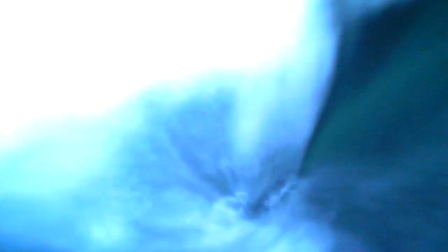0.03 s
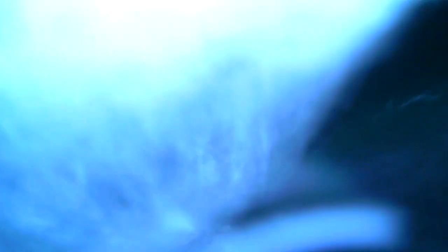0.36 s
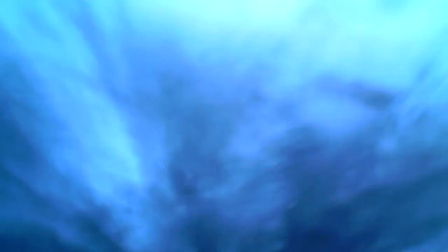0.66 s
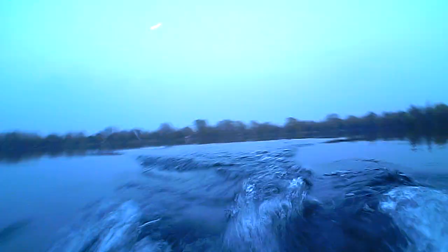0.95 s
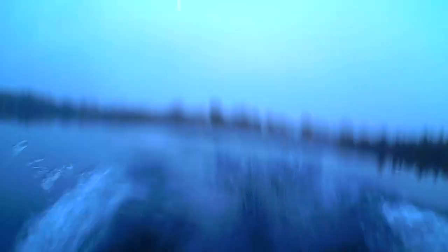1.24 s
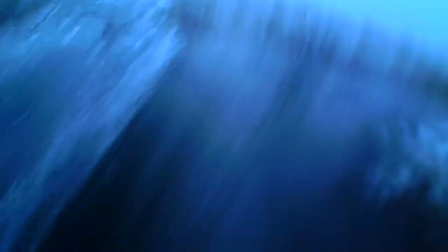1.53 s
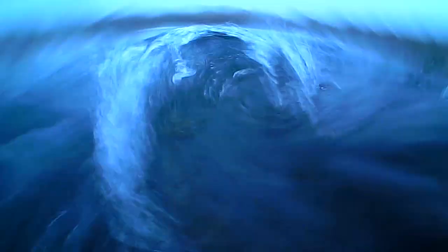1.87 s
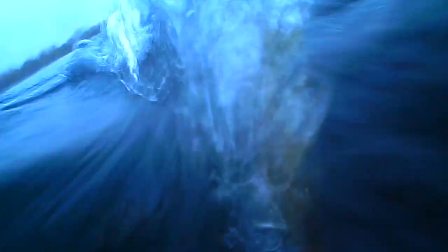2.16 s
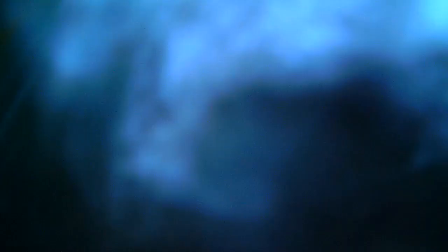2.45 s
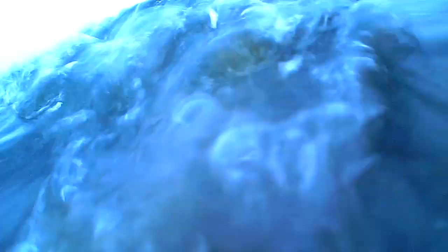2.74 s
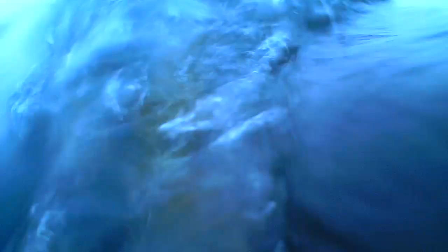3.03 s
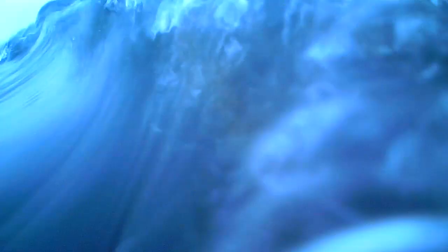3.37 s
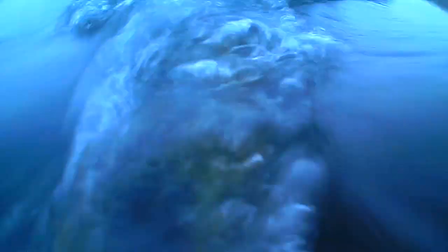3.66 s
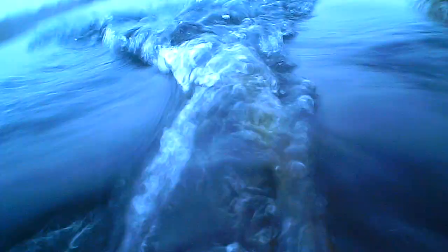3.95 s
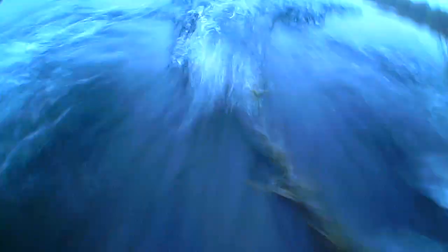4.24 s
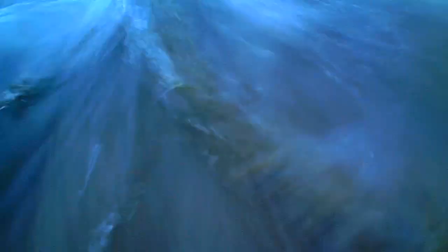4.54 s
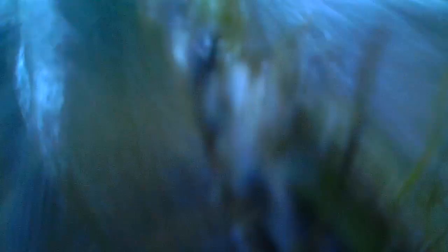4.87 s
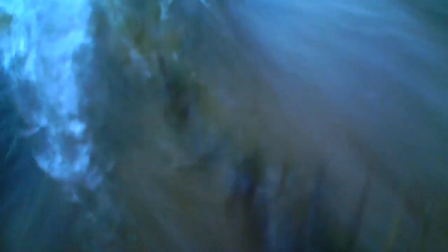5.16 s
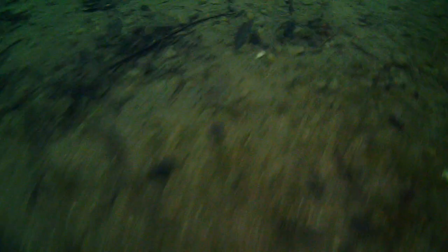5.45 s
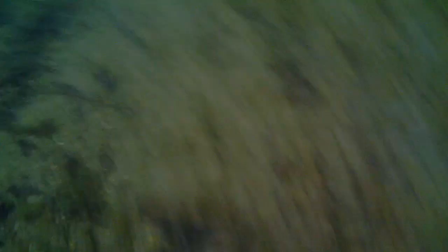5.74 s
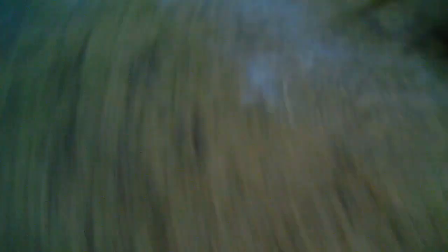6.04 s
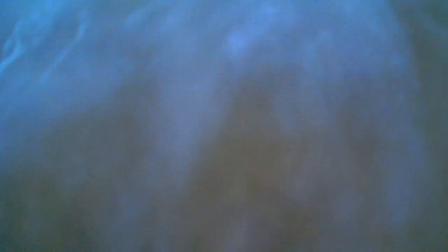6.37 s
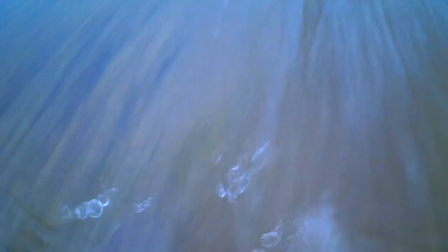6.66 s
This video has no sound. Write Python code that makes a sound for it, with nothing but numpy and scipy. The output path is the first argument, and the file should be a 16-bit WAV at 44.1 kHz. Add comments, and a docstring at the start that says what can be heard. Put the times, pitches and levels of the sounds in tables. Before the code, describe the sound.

A fishing reel whirrs and rasps in throbbing spurts through a taut line, while water splashes and bubbles close by.

```python
"""A fishing reel whirrs down a taut line into the housing of a small sealed camera towed through a lake.
The line rasps and squeaks by friction, coloured by the housing, and the meshing gears add a rough hum.
The whirr throbs with the winding, which stops once and starts again. As the camera breaks the surface,
bubbles ring against the shell, spray ticks on it and water sloshes past, over a low rumble and hiss."""
import sys
import numpy as np
from scipy import signal
from scipy.io import wavfile
from scipy.ndimage import uniform_filter1d

SR = 44100
rng = np.random.default_rng(int(sys.argv[2]) if len(sys.argv) > 2 else 0)


def to_wav(sig):
    """Store sig (one row per channel, or 1-D mono) as 16-bit WAV at the path in sys.argv[1].

    Samples outside -1..1 are clipped; the rate is SR.
    """
    pcm = np.clip(np.atleast_2d(sig), -1, 1) * 32767
    pcm = np.round(pcm).astype(np.int16)
    wavfile.write(sys.argv[1], SR, pcm.T)  # frames by channels


N = 295470
TIME = np.arange(N) / SR

# Levels are relative: each source applies its own gains.
# strain on the line through winding, stop and winding: t/s, rasp level/dB, hum level/dB
LINE_STRAIN = [(0, -49.5, -53), (.55, -45, -53), (.75, -46.5, -53), (.85, -53, -60), (1.08, -55, -62.5),
               (1.2, -56.5, -57), (1.35, -54.5, -73), (1.8, -51, -59.5), (2.45, -50.5, -59),
               (2.7, -42.5, -48), (3.15, -40, -51.5), (3.33, -43, -48), (3.55, -39, -46.5),
               (3.87, -38, -45.5), (4.13, -45, -45), (4.38, -41, -47.5), (4.62, -43.5, -42),
               (4.85, -39.5, -40.5), (5.02, -42, -43), (5.16, -46.5, -60.5), (5.24, -74, -82),
               (6.0, -76, -66), (6.07, -44.5, -47), (6.17, -40, -41), (6.42, -40.5, -38),
               (6.49, -44, -51.5), (6.56, -56, -71), (6.63, -41, -47), (6.7, -45.5, -54)]
# strokes of winding, each throbbing evenly until the next: start t/s, throb rate f/Hz
WINDING_STROKES = [(0.008, 48.5), (0.132, 54.4), (0.26, 50.3), (0.539, 46.1), (0.879, 63.5), (1.73, 49.5),
                   (2.565, 33.1), (2.739, 20.3), (2.886, 37.8), (2.992, 24.8), (3.113, 35.8), (3.169, 19.2),
                   (3.377, 28.9), (3.481, 35.1), (3.681, 21.9), (3.817, 32.1), (4.098, 20.9), (4.289, 24.1),
                   (4.372, 29.5), (4.542, 38.6), (4.775, 31.1), (4.904, 19.9), (6.073, 22.5), (6.162, 31.2),
                   (6.386, 23.2)]
# modulation of the whirr: t/s, throb depth, chatter depth (0-1)
MODULATION = [(0, 1.6, 0.1), (.75, 2, 0.34), (.9, 0.56, .2), (2.4, 0.37, 0.4), (2.6, 1.8, 0.86),
              (3.6, 1.43, 0.8), (4.3, 2.03, 0.62), (4.9, 1.6, .1), (5.1, 0.37, .1), (6.3, 1.55, 0.03),
              (6.7, 0.55, 0)]
# hardest tugs on the line: t/s, rasp level/dB, hum level/dB, half-width/s
LINE_TUGS = [(2.595, -36, -47, 0.0027), (3.641, -31, -39, 0.0012), (3.818, -32, -41, 0.0043),
             (3.94, -34, -46, 0.0027), (4.144, -50, -30, 0.0038), (4.332, -45, -42, 0.0021),
             (4.542, -39, -49, .0026), (4.723, -38, -48, .0024), (4.804, -33, -48, 0.0028),
             (6.196, -57, -31.5, 0.0039), (6.387, -32, -39, 0.0035)]
# bright response of the housing to the line: f/Hz, level/dB
RASP_RESPONSE = [(1000, -49), (1500, -14), (1800, -11.5), (2060, -33), (2170, -17.5), (2350, -7),
                 (2700, -8), (2950, 3.5), (3170, -2.5), (3500, 5), (3850, -2.5), (4150, -12.5),
                 (4450, -26.5), (9000, -99.5)]
# response to the line's softer, broader rub: f/Hz, level/dB
RUB_RESPONSE = [(900, -19.5), (1200, -22), (1360, 0), (1560, -1), (1800, -8), (2080, 8.5), (2200, -6),
                (2500, -6.5), (4000, 4.5), (4430, -35), (4800, -7.5), (5700, -11), (6700, -21),
                (12000, -44)]
# tooth rate of the gears, wandering with the winding speed: t/s, f/Hz
TOOTH_RATE = [(0, 780), (.55, 790), (.9, 735), (2.6, 715), (3.5, 755), (3.85, 725), (4.1, 785), (4.3, 745),
              (4.62, 720), (4.93, 765), (5.1, 735), (6.06, 720), (6.16, 780), (6.43, 760), (6.55, 725)]
# spectrum of the rough, noisy part of the gear hum: f/Hz, level/dB
GEAR_NOISE_SPECTRUM = [(200, -34.5), (350, -20.5), (480, -30), (610, -48.5), (670, -5), (700, -0.5),
                       (770, 3.5), (830, 1.5), (885, -20), (1000, -27), (1500, -64.5)]
# loudest bubbles: t/s, level/dB, f/Hz, 60 dB decay time/s
LOUDEST_BUBBLES = [(0.029, -38.5, 6270, .006), (0.1493, -37, 9806, .006), (0.288, -37, 5300, .009),
                   (0.3561, -12.5, 4040, 0.0034), (0.466, -22, 2110, 0.002), (0.569, -32.5, 5740, 0.0021),
                   (1.434, -26, 1430, .016), (1.873, -34.5, 1490, 0.027), (2.298, -29.5, 947, 0.04),
                   (2.352, -13.5, 3560, 0.0056), (2.3995, -16.5, 3500, 0.011), (2.406, -14, 3202, 0.0021),
                   (2.4122, -15.5, 3200, .009), (2.435, -30, 1420, 0.025), (2.4416, -23, 3400, .01),
                   (2.469, -22.5, 1640, 0.014), (2.48, -25.5, 3300, 0.0066), (2.489, -29.5, 1345, .021),
                   (3.1637, -28.5, 6000, .007), (3.2832, -27.5, 5760, 0.0051), (3.2924, -32, 5620, 0.016),
                   (3.374, -13.5, 3140, 0.0087), (5.3777, -21, 5900, 0.0037), (5.3775, -24.5, 4100, .0046),
                   (5.3785, -25, 11000, .004), (5.385, -25.5, 3200, 0.0099), (5.393, -25, 5200, .006),
                   (5.423, -24.5, 3280, 0.007), (5.4426, -31, 1730, 0.023), (5.4512, -26, 1060, 0.042),
                   (5.4584, -20, 4440, .0021), (5.473, -23, 2870, .014), (5.4738, -27.5, 1980, 0.024),
                   (5.4804, -26, 5660, .0046), (5.487, -25.5, 3450, 0.016), (5.491, -29, 2930, 0.026),
                   (5.517, -33, 1450, 0.0074), (5.5257, -22.5, 2975, 0.022), (5.566, -41, 1350, .01),
                   (5.584, -43, 3670, .02), (5.626, -44, 1650, .034), (5.6494, -31.5, 2020, .003),
                   (5.6732, -42.5, 3120, .017), (5.7082, -40, 1340, 0.01), (5.7461, -22, 3070, .005),
                   (5.7635, -31.5, 3100, 0.0041), (5.8854, -41.5, 536, 0.011), (5.9328, -47, 2900, .009)]
# largest drops of spray: t/s, tick level/dB, knock level offset/dB
SPRAY_DROPS = [(0.0278, -44, 3), (0.194, -37, 4), (0.285, -46, 10), (0.3539, -28.5, -7), (0.47, -33, 3),
               (0.748, -32, 4.5), (0.7751, -32.5, 0), (1.4299, -28.5, 1), (1.4554, -44, 11),
               (1.4768, -27, 3), (1.4903, -29.5, 10.5), (1.619, -28.5, 2.5), (1.6512, -23, 0),
               (1.728, -30, -2), (1.942, -36.5, 3.5), (2.0306, -37, 11.5), (2.0896, -36, 12),
               (2.1073, -37, 4), (2.2865, -35.5, 9), (2.3268, -32, -8), (2.3537, -23.5, 6),
               (2.41, -27.5, 10), (2.4773, -33, 11), (2.6847, -31, -11), (3.6784, -31.5, -11),
               (3.9122, -31, -8), (5.3742, -23, -9), (5.3935, -29, 1), (5.4803, -43, 3), (5.585, -44, 7),
               (5.7487, -41, 12), (6.2377, -39.5, 5)]
# thin ring of the shell: f/Hz, level/dB
SHELL_RESPONSE = [(3500, -24.5), (4700, -10), (5350, 4), (6000, -4.5), (6600, -9), (7600, 9), (8600, -9.5),
                  (9500, -4.5), (10150, -13), (10800, -6), (12000, -18), (14500, -15), (16500, -24)]
# response of the body to a sharp impact: f/Hz, level/dB
KNOCK_RESPONSE = [(100, -20), (800, -12), (1050, -24), (1500, 5), (2200, 4.5), (3000, 8.5), (3700, -11),
                  (4600, -4), (7000, -71), (12000, -99)]
# response of the body to the push of water: f/Hz, level/dB
BODY_RESPONSE = [(30, -9), (100, -0.5), (220, 0), (450, -3.5), (750, 3.5), (1050, -10), (1450, 5.5),
                 (1750, 1.5), (2200, -3.5), (3000, 3), (3700, -3.5), (4500, -14.5), (9000, -75)]
# waves washing over the shell: start t/s, duration/s, slosh level/dB, fizz level/dB
WAVE_WASHES = [(0, 0.32, -63, -58.5), (.62, 0.063, -53.5, -58), (0.863, 0.051, -50.5, -57.5),
               (1.149, 0.1, -53.5, -64), (1.416, 0.091, -52, -52.5), (1.569, 0.13, -60.5, -52.5),
               (1.968, 0.11, -58, -57), (2.289, 0.097, -52, -56), (2.396, 0.014, -42, -39.5),
               (2.475, 0.085, -52.5, -61.5), (2.676, .025, -58, -47), (3.008, 0.26, -58.5, -61),
               (3.29, 0.21, -50.5, -59), (3.736, 0.046, -55, -63), (5.367, 0.048, -57, -52.5),
               (5.431, 0.11, -53, -62), (5.555, 0.091, -65, -64.5), (5.74, 0.021, -58, -54.5),
               (5.831, 0.1, -64.5, -80), (6.158, 0.34, -83, -69)]
# slosh of the steady flow, weaker while the winding rests: t/s, level/dB
STEADY_FLOW = [(0, -59.5), (4.9, -61), (5.25, -67.5), (5.8, -67.5), (6.2, -59.5)]
# deep buffeting by the current: t/s, level/dB
BUFFETING = [(0, -57), (.5, -66), (.7, -56), (1.5, -57.5), (1.7, -58), (2.4, -60), (3.4, -59), (4.25, -58),
             (4.7, -59.5), (5.3, -58.5), (6.7, -59)]
# spectra of the rumble and of the steady hiss: f/Hz, level/dB
RUMBLE_SPECTRUM = [(20, 6), (50, -5), (90, -7.5), (200, -26), (1000, -64)]
HISS_SPECTRUM = [(20, -13), (100, -21.5), (300, -24), (800, -26), (1500, -50), (4000, -31.5),
                 (9000, -32.5), (14000, -35.5), (16000, -41.5)]


def line(rasp_db=-1, rub_db=-9.5, rub_follows=0.35, even_share=0.13, chatter_hz=104.8,
         squeak_share=0.69, squeak_above_db=-46):
    """Friction drives the housing: irregular slips of the line rasp, regular ones squeak."""
    _, chatter = follow(MODULATION)
    stutter = 1 + chatter * np.cos(unsteady_phase(chatter_hz, jitter=0.2984, wobble_hz=60.3))
    pulsing = even_share + (1 - even_share) * throb_power(sharpness=0.94) * stutter
    power = gain_of(follow(LINE_STRAIN)[0]) ** 2 * pulsing + tugs()[0]
    # part of the power above a threshold becomes pitched; the rest stays rough
    pitched = squeak_share * (1 - chatter / 2) * np.maximum(power - gain_of(squeak_above_db) ** 2, 0)
    rough = np.maximum(power - pitched, 0)
    squeaks = squeak() * np.sqrt(pitched)
    slips = squeaks + grains(per_s=14000, spread_db=2.3) * np.sqrt(rough)
    # the rub follows the throbs only in part
    steady = np.maximum(uniform_filter1d(power, size=SR // 20), 0)
    rub_power = rub_follows * rough + (1 - rub_follows) * steady
    rub = np.sqrt(rub_follows) * squeaks + rng.standard_normal(N) * np.sqrt(rub_power)
    return gain_of(rasp_db) * through(slips, RASP_RESPONSE) + gain_of(rub_db) * through(rub, RUB_RESPONSE)


def squeak(slip_hz=680, pitch_scatter=0.08, fall_per_s=15, fall_scatter_per_s=7, harmonics=9):
    """Stick-slip oscillation: a harmonic series whose fundamental glides down through each throb."""
    number, _, age = throb_timing()
    pitch, fall = rng.standard_normal((number[-1] + 1, 2))[number].T
    rate = slip_hz * np.exp(pitch_scatter * pitch - (fall_per_s + fall_scatter_per_s * fall) * age)
    phase = unsteady_phase(rate, jitter=0.028, wobble_hz=151)
    return evened(sum(np.cos(k * phase) for k in range(1, harmonics + 1)))


def gears(tone_db=-3, noise_db=-4, octave_db=-17, suboctave_db=-23):
    """Periodic forcing: meshing teeth sound a wandering tone at the tooth rate, roughened by noise."""
    force = np.sqrt(gain_of(follow(LINE_STRAIN)[1]) ** 2 * throb_power(sharpness=0.84) + tugs()[1])
    phase = unsteady_phase(follow(TOOTH_RATE)[0], jitter=0.03, wobble_hz=30.7)
    octaves = gain_of(octave_db) * np.sin(2 * phase) + gain_of(suboctave_db) * np.sin(phase / 2)
    tone = np.sqrt(2) * (np.sin(phase) + octaves)
    roughness = through(force * rng.standard_normal(N), GEAR_NOISE_SPECTRUM)
    return gain_of(tone_db) * force * tone + gain_of(noise_db) * roughness


def throb_timing():
    """Periodic motion in each stroke: the nearest throb's number, and cycles and seconds from its peak."""
    start, rate = np.transpose(WINDING_STROKES)
    stroke = np.maximum(np.searchsorted(start, TIME) - 1, 0)
    cycle = ((TIME - start[stroke]) * rate[stroke] + 0.5) % 1 - 0.5
    number = np.cumsum(np.diff(cycle, prepend=cycle[0]) < -0.5)
    return number, cycle, cycle / rate[stroke]


def throb_power(sharpness, scatter_db=1):
    """Amplitude modulation: one bell of power per cycle, each of its own strength, with mean near one."""
    number, cycle, _ = throb_timing()
    depth = sharpness * follow(MODULATION)[0]
    strength = gain_of(scatter_db * rng.standard_normal(number[-1] + 1))[number]
    return strength ** 2 * np.exp(depth * np.cos(2 * np.pi * cycle)) / np.i0(depth)


def tugs():
    """Transient loading: each hard tug gives a Gaussian pulse of power to the rasp and to the hum."""
    t = np.arange(-SR // 32, SR // 32) / SR
    rasp, hum = np.zeros((2, N))
    for s, rasp_db, hum_db, half_width in LINE_TUGS:
        bell = np.exp(-(t / half_width) ** 2)
        add(rasp, s + t[0], gain_of(rasp_db) ** 2 * bell)
        add(hum, s + t[0], gain_of(hum_db) ** 2 * bell)
    return rasp, hum


def bubbles(swell_cycles=0.83, rise=0.023, body_db=-14, shell_db=-24, echo_db=-12, echo_s=0.02):
    """Bubble resonance: each air pocket jolts the housing as it closes and rings, damped and rising."""
    t = np.arange(SR // 10) / SR
    tones, jolts = np.zeros((2, N))
    for s, db, hz, t60 in LOUDEST_BUBBLES:
        envelope = (1 - np.exp(-t * hz / swell_cycles)) * np.exp(-np.log(1000) * t / t60)
        turns = np.cumsum(hz * (1 + rise * (np.minimum(t / t60, 1) - 1 / 4))) / SR
        add(tones, s, gain_of(db) * envelope / envelope.max() * np.sin(2 * np.pi * turns))
        add(jolts, s + swell_cycles / hz / 2, gain_of([db]))
    body = gain_of(body_db) * through(jolts, KNOCK_RESPONSE) / abs(ring(KNOCK_RESPONSE)).max()
    shell = gain_of(shell_db) * through(jolts, SHELL_RESPONSE) / abs(ring(SHELL_RESPONSE)).max()
    # short echoes off the shell and the water surface return the low tones a moment later
    scatter = rng.standard_normal(len(t)) * np.exp(-t / echo_s)
    echoes = signal.oaconvolve(lowpass(tones, hz=2200), scatter / np.linalg.norm(scatter))[:N]
    return tones + body + shell + gain_of(echo_db) * echoes


def spray(knock_db=-4, first_touch=0.27, splatter_s=0.0011):
    """Impact excitation: a drop's first touch and brief splatter set shell and body ringing."""
    t, out = np.arange(SR // 32) / SR, np.zeros(N)
    shell, body = ring(SHELL_RESPONSE), ring(KNOCK_RESPONSE)
    for s, db, offset_db in SPRAY_DROPS:
        force = rng.standard_normal(len(t)) * t / splatter_s * np.exp(-t / splatter_s)
        force[0] = first_touch
        tick = signal.fftconvolve(force, shell)
        knock = gain_of(knock_db + offset_db) * signal.fftconvolve(force, body)
        add(out, s, gain_of(db) * (tick + knock) / abs(tick).max())
    return out


def water(eddy_db=6, gurgle_db=-2, foam_db=-3, sparkle_db=-2):
    """Flow noise: eddies push on the body and trap gurgling air; foam crackles and sparkles."""
    wash, fizz = waves()
    slosh = np.hypot(wash, gain_of(follow(STEADY_FLOW)[0]))  # waves and flow add in power
    eddies = through(slosh * grains(per_s=3000, spread_db=3.5), BODY_RESPONSE)
    gurgle = bubble_swarm(slosh, low_hz=521, high_hz=3370, per_s=450, decay_cycles=4.4, spread_db=6)
    foam = through(fizz * grains(per_s=1500, spread_db=7.5), SHELL_RESPONSE)
    sparkle = bubble_swarm(fizz, low_hz=4640, high_hz=9850, per_s=450, decay_cycles=10.7, spread_db=7)
    return (gain_of(eddy_db) * eddies + gain_of(gurgle_db) * gurgle
            + gain_of(foam_db) * foam + gain_of(sparkle_db) * sparkle)


def waves(rise_s=0.005, drain_s=0.022):
    """Envelopes of slosh and fizz: each wave rises quickly, holds and drains by exponential decay."""
    t = TIME[:SR]
    slosh, fizz = np.zeros((2, N))
    for s, duration, slosh_db, fizz_db in WAVE_WASHES:
        envelope = np.minimum(t / rise_s, 1) * np.exp(-np.maximum(t - duration, 0) / drain_s)
        add(slosh, s, gain_of(slosh_db) * envelope)
        add(fizz, s, gain_of(fizz_db) * envelope)
    return slosh, fizz


def bubble_swarm(strength, low_hz, high_hz, per_s, decay_cycles, spread_db, sizes=24):
    """Incoherent sum: small bubbles of scattered sizes ring at random, each rising in pitch as it dies."""
    t, out = np.arange(SR // 16) / SR, np.zeros(N)
    for hz in low_hz * (high_hz / low_hz) ** ((np.arange(sizes) + rng.random(sizes)) / sizes):
        age = t * hz / decay_cycles
        envelope = (1 - np.exp(-t * hz / 2)) * np.exp(-age)
        plink = envelope * np.sin(2 * np.pi * hz * t * (1 + 0.013 * np.minimum(age, 5)))
        births = strength * grains(per_s / sizes, spread_db)
        out += signal.oaconvolve(births, plink / np.linalg.norm(plink))[:N]
    return out / np.sqrt(sizes)


def current(gust_db=2):
    """Turbulent pressure fluctuations on the housing make a deep, uneven rumble."""
    pressure = gain_of(follow(BUFFETING)[0] + gust_db * wobble(hz=8.3)) * rng.standard_normal(N)
    return through(pressure, RUMBLE_SPECTRUM)


def hiss(level_db=-60):
    """Stationary coloured noise: a faint, steady background."""
    return gain_of(level_db) * through(rng.standard_normal(N), HISS_SPECTRUM)


def ring(spectrum, size=4096):
    """Minimum-phase impulse response of unit energy with a given spectrum."""
    hz, db = np.transpose(spectrum)
    log_hz = np.log(abs(np.fft.fftfreq(size, 1 / SR)) + 1)
    log_gain = np.log(gain_of(np.interp(log_hz, np.log(hz), db)))
    response = np.fft.ifft(np.exp(np.conj(signal.hilbert(log_gain)))).real[:size // 2]
    return response / np.linalg.norm(response)


def through(force, spectrum):
    """Linear filtering: convolution colours a force with the given spectrum."""
    return signal.oaconvolve(force, ring(spectrum))[:N]


def grains(per_s, spread_db):
    """Shot noise of unit rms: random tiny impacts of uneven size."""
    size = gain_of(spread_db * np.minimum(rng.exponential(1, N), 4))
    return evened(size * rng.choice([-1, 1], N) * (rng.random(N) < per_s / SR))


def unsteady_phase(hz, jitter, wobble_hz):
    """Frequency modulation: the phase of an oscillation whose rate wanders at random."""
    return 2 * np.pi * np.cumsum(hz * (1 + jitter * wobble(wobble_hz))) / SR


def wobble(hz):
    """Smooth random fluctuation of unit rms and bandwidth hz."""
    return evened(lowpass(rng.standard_normal(N), hz))


def lowpass(x, hz):
    """Second-order attenuation above a cutoff."""
    return signal.sosfilt(signal.butter(2, hz, fs=SR, output="sos"), x)


def follow(table):
    """Linear interpolation in time: each value column at every sample."""
    s, *columns = np.transpose(table)
    return [np.interp(TIME, s, column) for column in columns]


def gain_of(db):
    """Amplitude ratio of a level in decibels."""
    return 10 ** (np.asarray(db) / 20)


def evened(x):
    """Normalisation to unit rms."""
    return x / np.sqrt(np.mean(x ** 2) + 1e-20)


def add(mix, s, sound):
    """Superposes a sound on the mix from s seconds on."""
    part = mix[max(round(s * SR), 0):][:len(sound)]
    part += sound[:len(part)]


def scene():
    """Superposition: all sources sum at the one microphone in the housing."""
    background = hiss()
    return (line() + gears() + bubbles() + spray() + water() + current() + background)[None]


def record(dry):
    """Band limiting: a linear-phase low-pass removes the treble above 16 kHz."""
    return signal.oaconvolve(dry, signal.firwin(255, 16000, window=("kaiser", 7), fs=SR)[None], "same")


dry = scene()
out = record(dry)
to_wav(out)
```